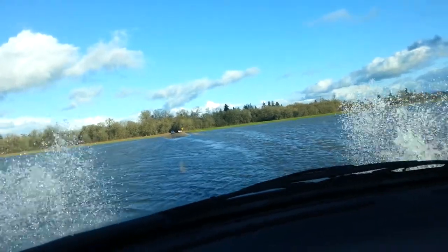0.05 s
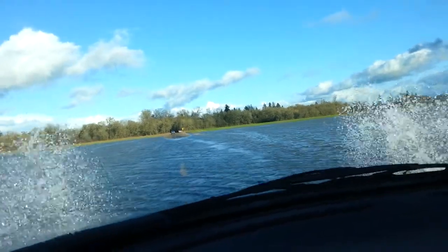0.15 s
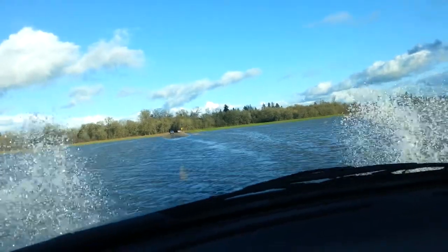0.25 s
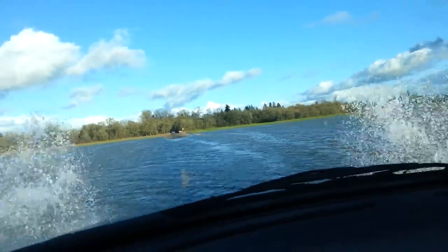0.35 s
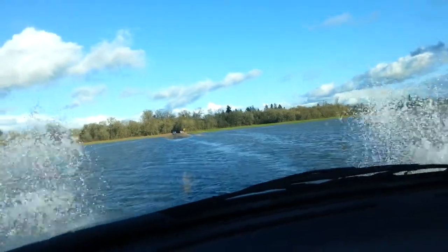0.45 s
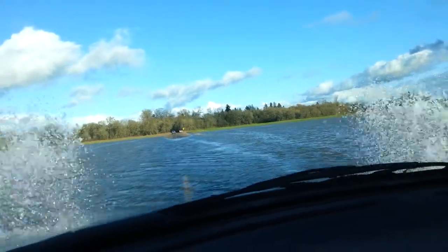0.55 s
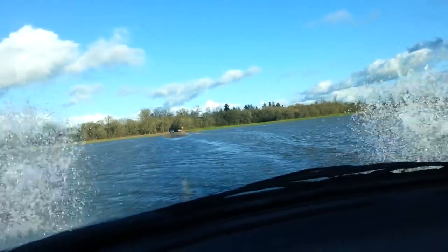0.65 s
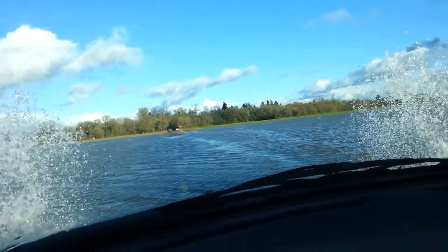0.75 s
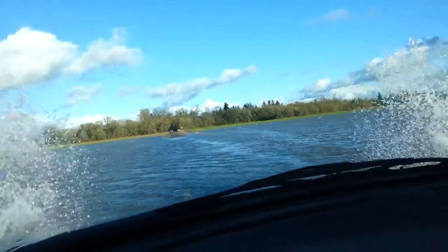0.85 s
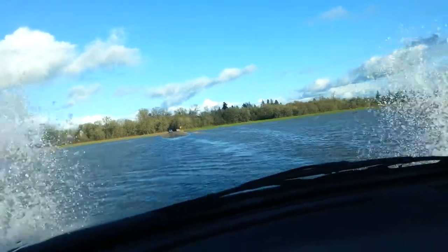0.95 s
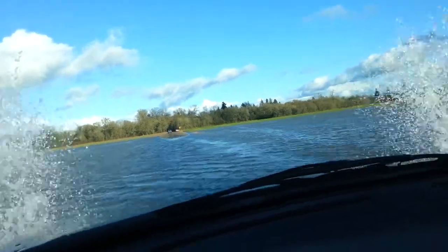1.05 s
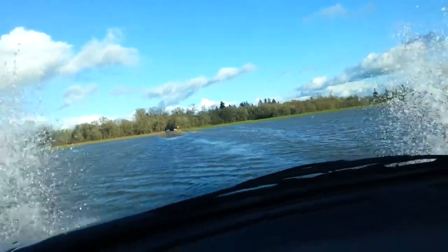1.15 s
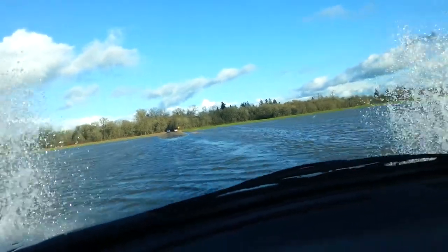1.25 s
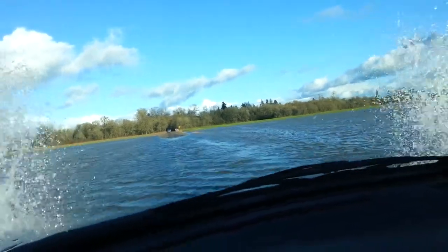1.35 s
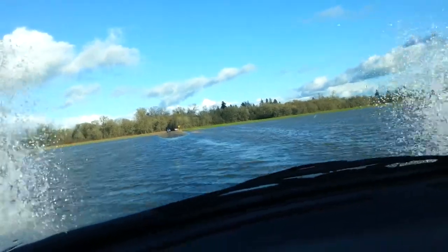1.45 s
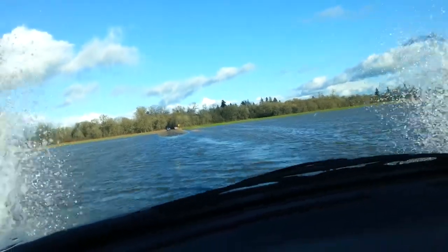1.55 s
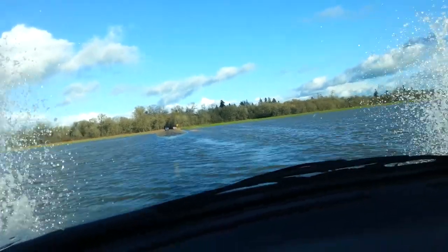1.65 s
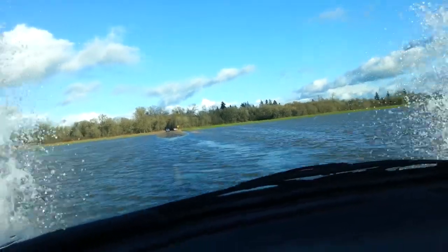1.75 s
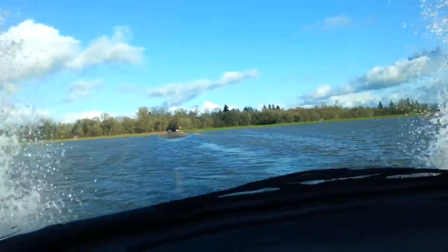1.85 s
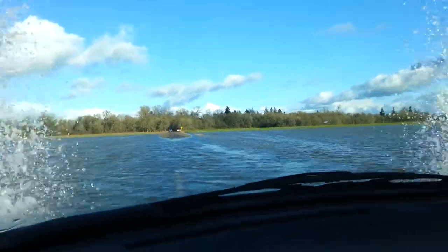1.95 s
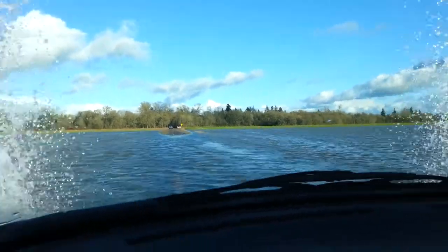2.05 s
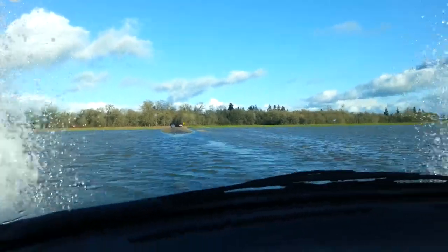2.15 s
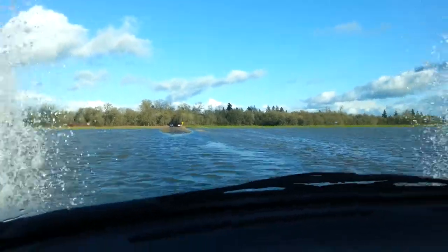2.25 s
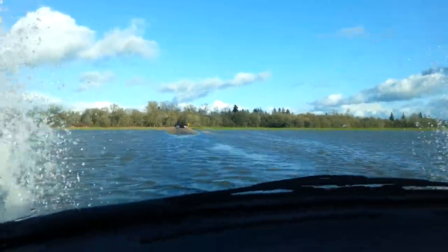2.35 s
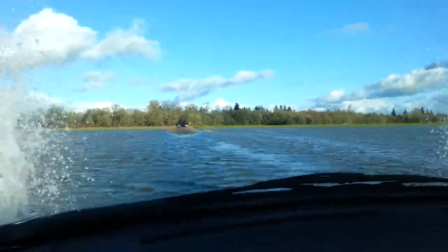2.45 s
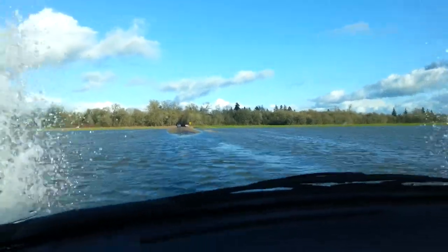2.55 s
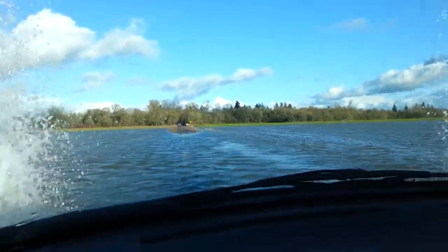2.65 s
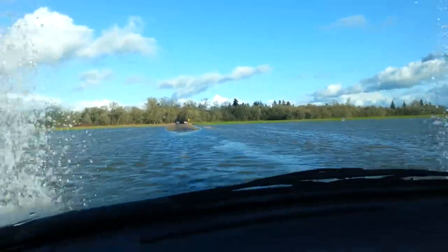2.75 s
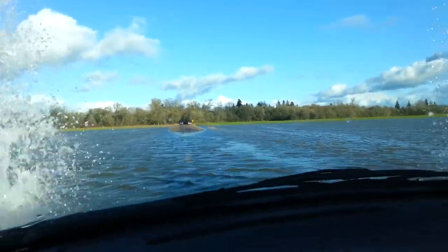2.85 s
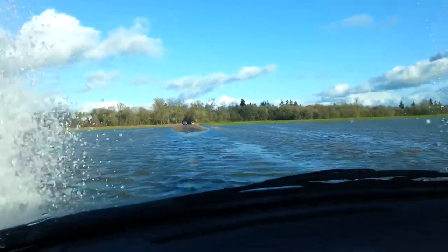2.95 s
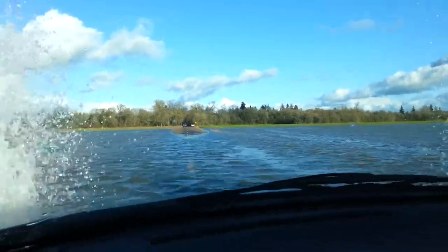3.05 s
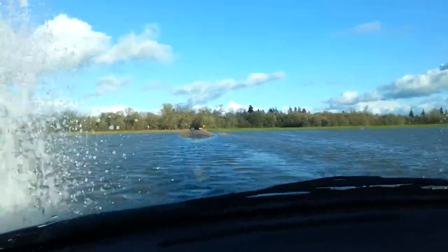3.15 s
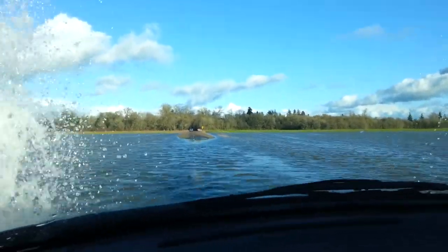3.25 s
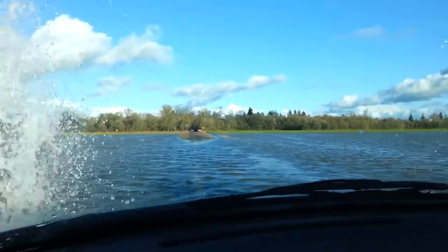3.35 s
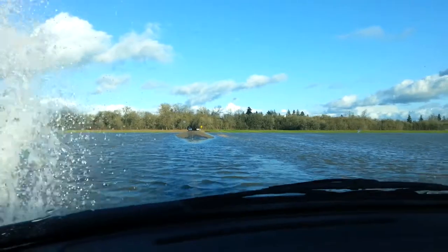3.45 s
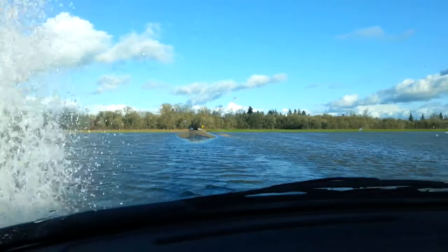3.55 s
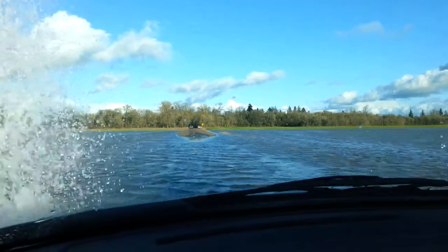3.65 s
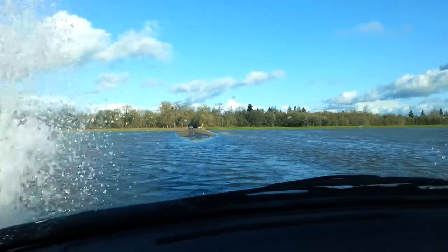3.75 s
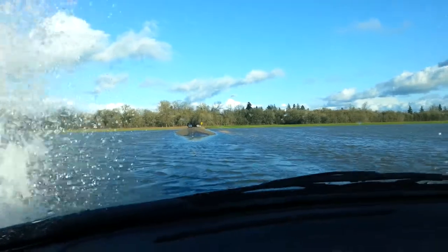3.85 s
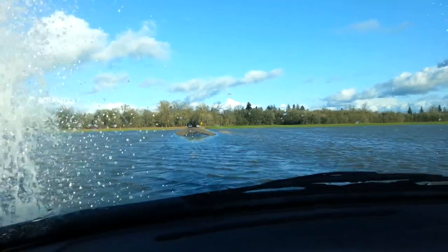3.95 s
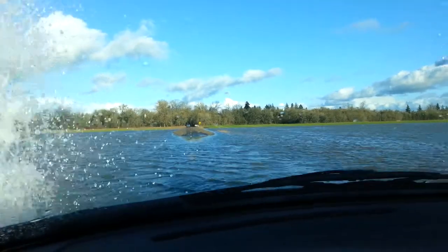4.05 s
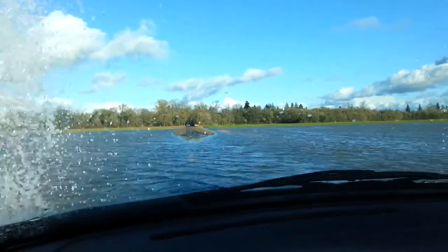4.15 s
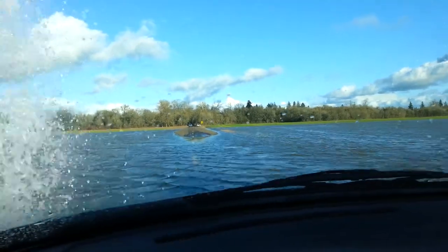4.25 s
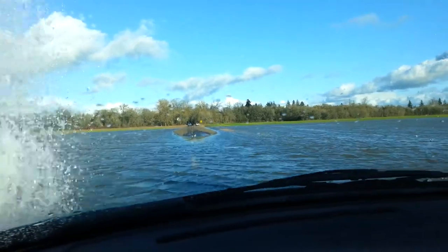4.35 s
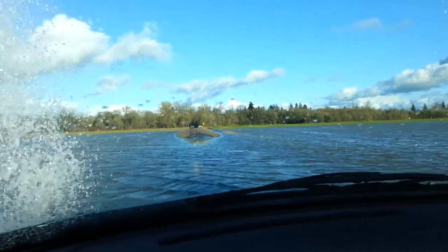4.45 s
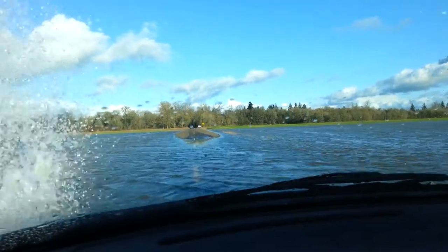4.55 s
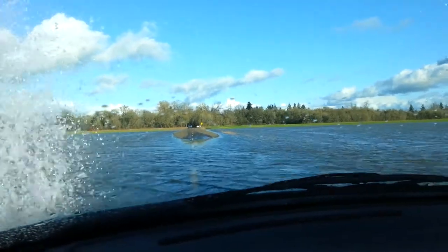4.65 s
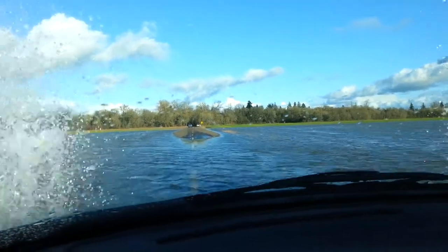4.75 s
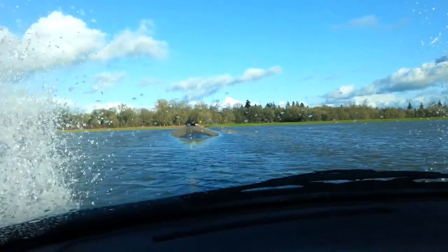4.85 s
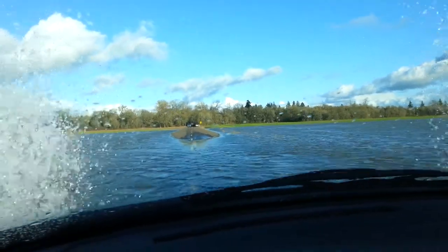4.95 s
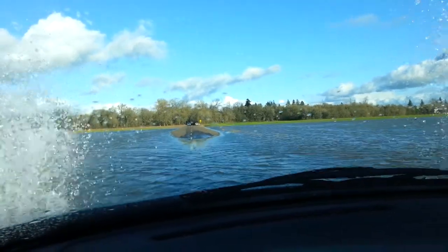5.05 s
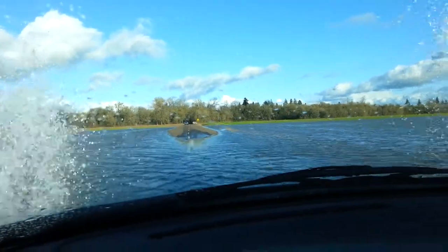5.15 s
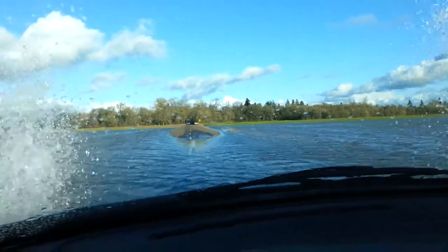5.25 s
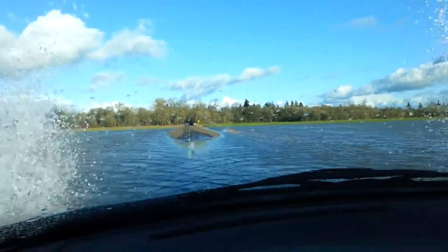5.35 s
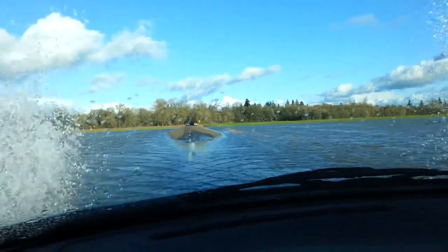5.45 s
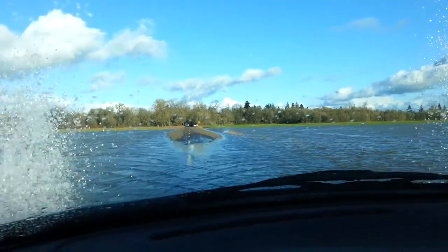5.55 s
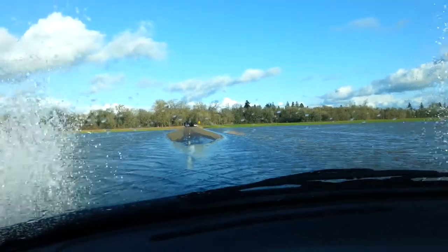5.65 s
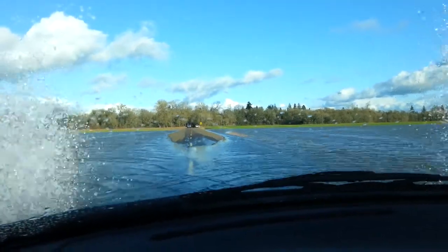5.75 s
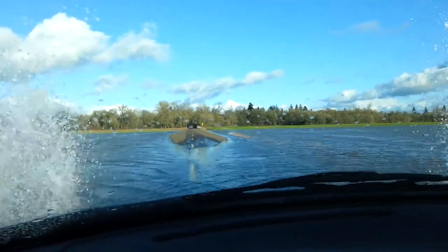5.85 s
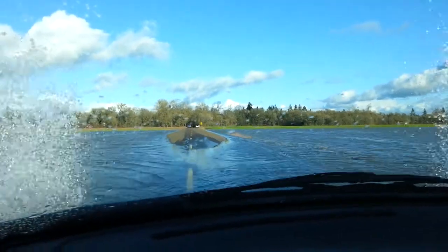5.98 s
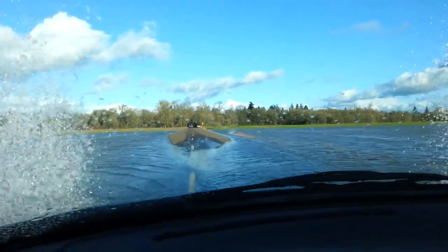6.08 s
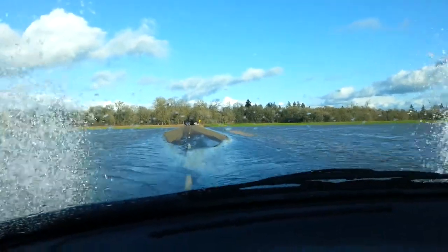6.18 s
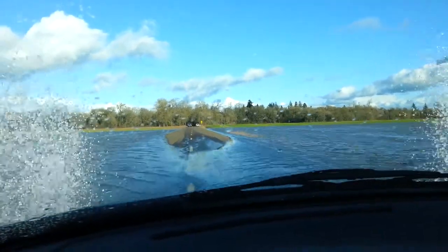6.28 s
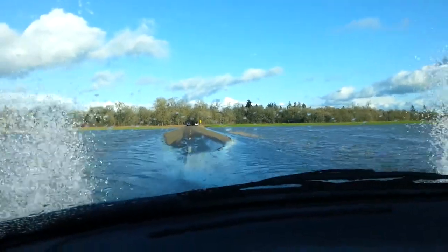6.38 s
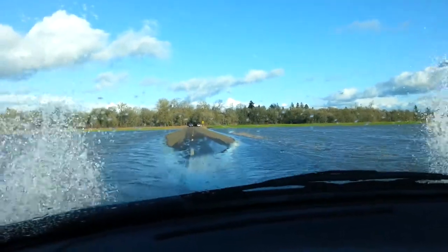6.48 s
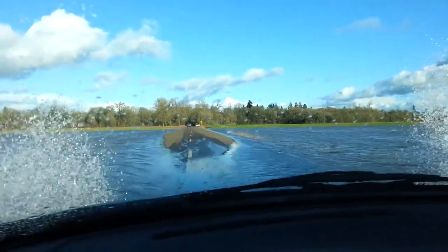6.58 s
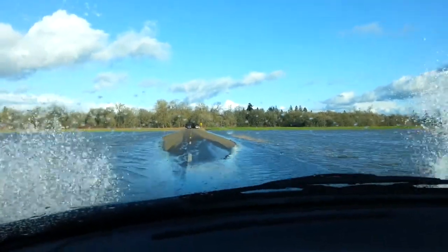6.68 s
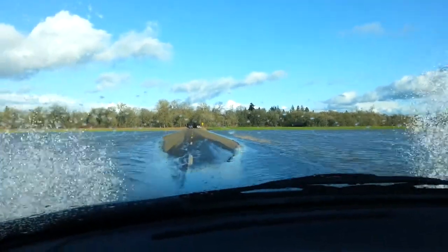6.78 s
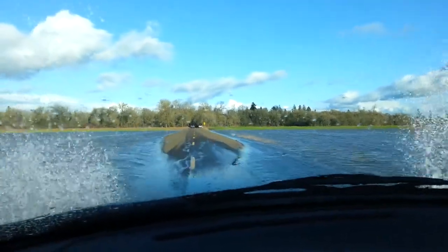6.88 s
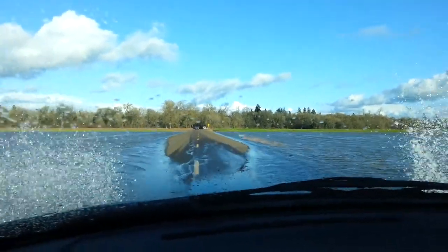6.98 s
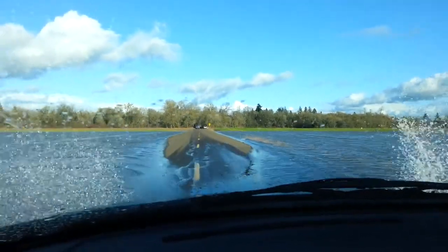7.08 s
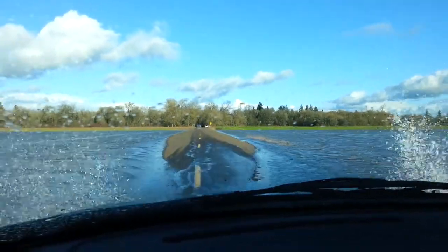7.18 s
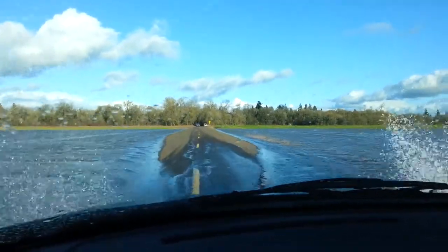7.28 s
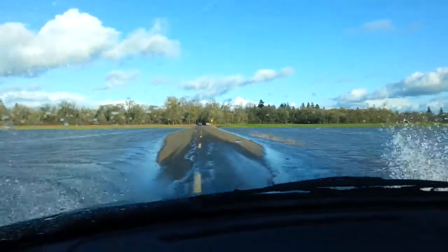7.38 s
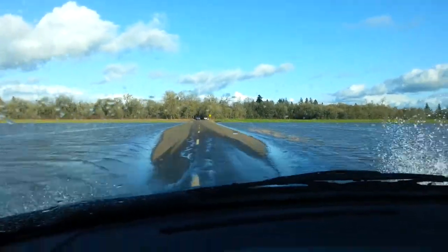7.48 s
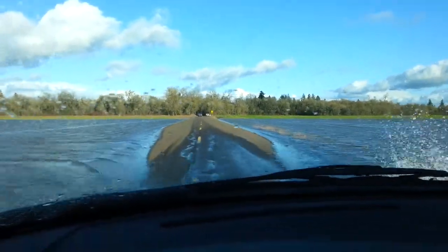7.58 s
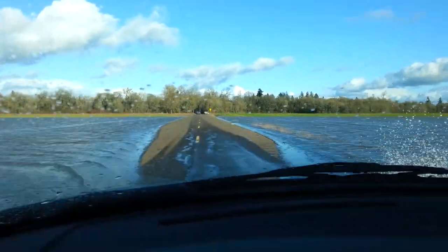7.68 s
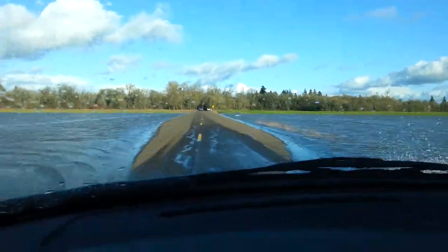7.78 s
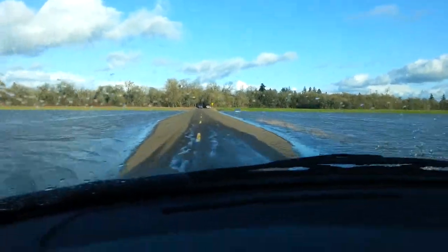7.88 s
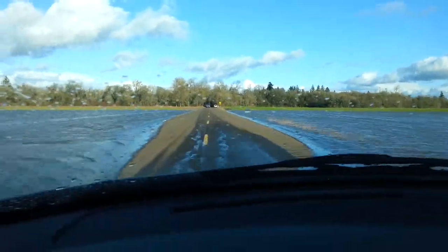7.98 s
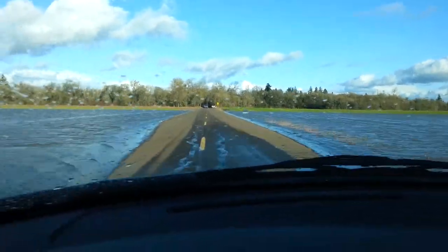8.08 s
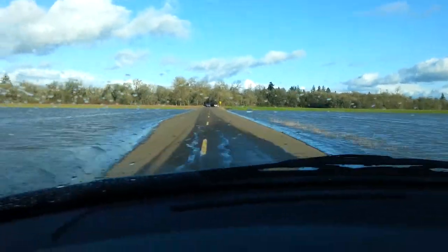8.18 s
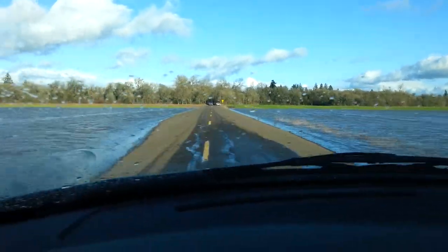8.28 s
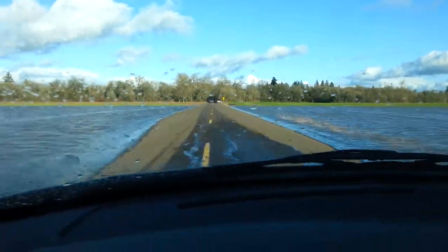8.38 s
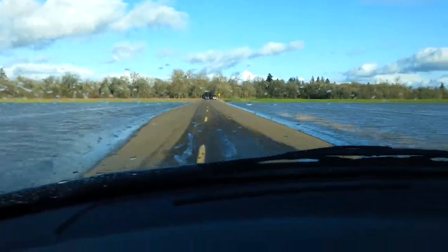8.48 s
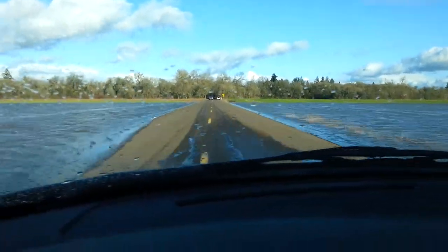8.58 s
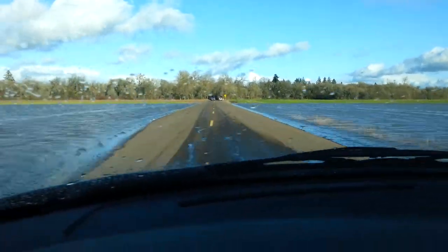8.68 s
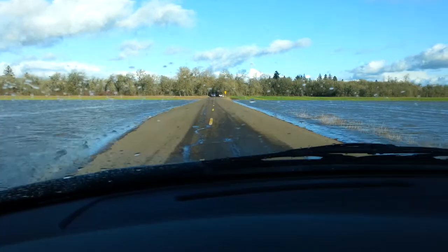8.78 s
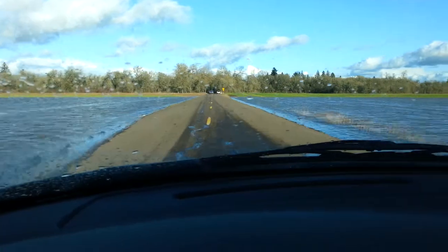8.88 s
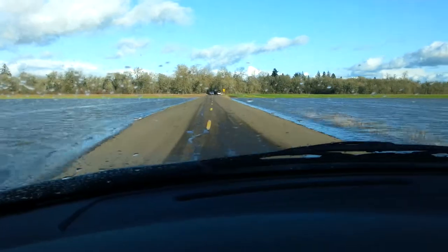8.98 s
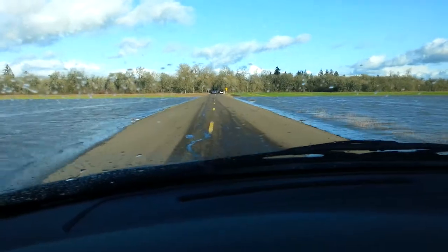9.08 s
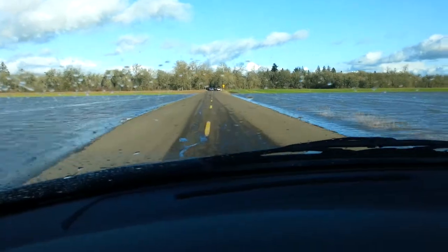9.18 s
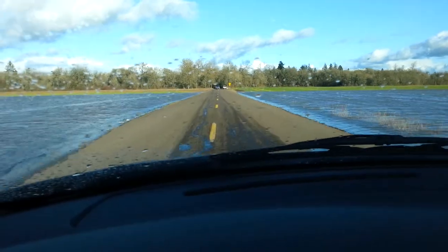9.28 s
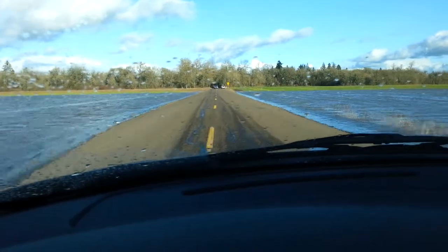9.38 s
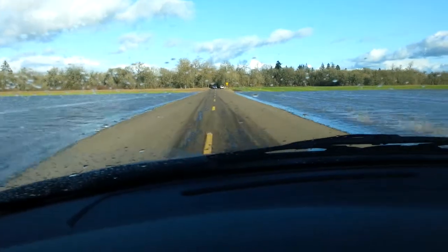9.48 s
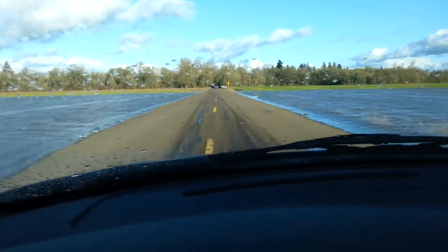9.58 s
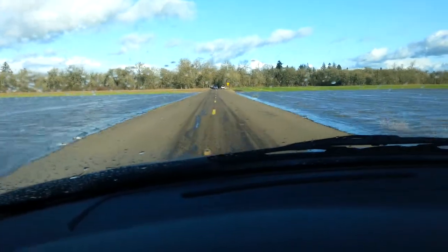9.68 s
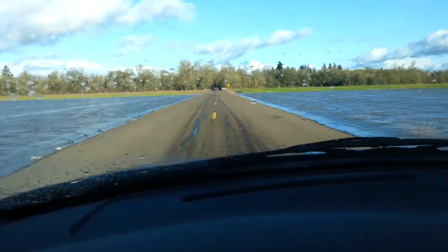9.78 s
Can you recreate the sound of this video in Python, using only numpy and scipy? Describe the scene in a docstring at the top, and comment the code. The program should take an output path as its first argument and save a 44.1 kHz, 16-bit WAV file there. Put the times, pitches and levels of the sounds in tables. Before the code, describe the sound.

Heard from a dashboard inside a moving car: floodwater drums heavily on the floor pan, surging with dull slaps, spray in the wheel arches and ringing plinks. Around seven seconds the pounding falls away quickly, leaving tyre roar, a low engine note, a brief rising gear whine and a few small splats, with faint hiss.

```python
"""Inside a car in floodwater, heard by a phone on the dashboard. From 0 to 7 s sheets of water drum on the
floor pan in surges, with slaps, plinks and spray in the wheel arches; a thin top tone lasts to 2.1 s and
squeaks come at 3.4 and 5.1 s. From 7 s the road dries: tyre roar, engine note, a gear whine to 8.5 s, last
splats and plinks, a squeak at 8.7 s and clearer hiss. Water is random noise bursts shaped in spectrum and
level; slaps and plinks are damped sines; engine, whine and squeaks are wavering sines."""
import sys
import numpy as np
from scipy import signal
from scipy.fft import rfft, irfft, next_fast_len
from scipy.io import wavfile
from scipy.ndimage import uniform_filter1d

SR = 44100
rng = np.random.default_rng(int(sys.argv[2]) if len(sys.argv) > 2 else 0)


def digitize_waveform(pressure):
    """Quantize a signal to 16-bit integers and store it at the path in sys.argv[1].

    Rows of a 2-D input are taken as channels; values are limited to [-1, 1].
    """
    field = np.atleast_2d(pressure).T
    bounded = np.clip(field, -1, 1)
    quanta = np.round(bounded * 32767).astype(np.int16)
    wavfile.write(sys.argv[1], SR, quanta)


N = 433062


def undb(db):
    """Amplitude ratio from dB."""
    return 10 ** (np.asarray(db) / 20)


def level(x, rms_db):
    """Scale to an RMS level."""
    return x * undb(rms_db) / np.sqrt(np.mean(x ** 2))


def curves(table):
    """Value columns of a time table as sample-rate curves."""
    time_s, *columns = np.transpose(table)
    return [np.interp(np.arange(N) / SR, time_s, c) for c in columns]


def on_log(hz, table):
    """A (frequency [Hz], value) table read on a log frequency axis."""
    table_hz, value = np.transpose(table)
    return np.interp(np.log(np.maximum(hz, 1)), np.log(table_hz), value)


def butter(x, order, hz, kind):
    """Causal Butterworth filter."""
    return signal.sosfilt(signal.butter(order, hz, kind, fs=SR, output="sos"), x)


def walk(rate_hz):
    """Random levels held 1 / rate_hz, then smoothed twice; spread near 1."""
    hold = int(SR / rate_hz)
    steps = np.repeat(rng.standard_normal(N // hold + 1), hold)
    return 1.3 * uniform_filter1d(uniform_filter1d(steps, hold), hold)[:N]


def drops(rate_hz, spread_db, t60_s):
    """Two streams of random impacts, a few much bigger than the rest, each a noise burst dying in the cabin."""
    hit = rng.random((2, N)) < rate_hz / SR
    power = hit * undb(2 * spread_db * rng.exponential(size=(2, N)))
    fade = np.exp(-2 * np.log(1000) / (t60_s * SR))
    envelope = np.sqrt(signal.lfilter([1], [1, -fade], power))
    return envelope * rng.standard_normal((2, N))


# likeness of the ears before the phase turn: (frequency [Hz], left-right correlation [-])
EAR_LIKENESS = [(60, 0.94), (130, 1), (290, 0.89), (620, 0.55), (1100, 0.43), (2500, 0.29), (4000, 0),
                (14000, 0)]
# phase lead of the left port: (frequency [Hz], lead [rad])
PORT_LEAD = [(700, 0), (1030, -1.76), (1890, -2.5), (2900, -6)]


def colour(pair, spectrum, flicker_db=0., shared_db=0., rate_hz=10.):
    """Two streams through a body and the cabin at unit RMS: wide bands waver, the bass is alike in both ears."""
    size = next_fast_len(N)
    hz = np.arange(size // 2 + 1) * SR / size
    like = np.clip(on_log(hz, EAR_LIKENESS), -1, 1)
    mid, side = rfft(pair, size) * undb(on_log(hz, spectrum)) * np.sqrt([1 + like, 1 - like])
    right_turn = np.exp(-1j * on_log(hz, PORT_LEAD))
    ears = np.array([mid + side, (mid - side) * right_turn])
    if not flicker_db:
        return level(irfft(ears, size)[:, :N], 0)
    # six overlapping bands, 1.5 octaves apart from 60 Hz
    band = np.clip(np.log2(np.maximum(hz, 1) / 60) / 1.5, 0, 5)
    out = 0
    for k in range(6):
        weight = np.clip(1 - np.abs(band - k), 0, 1)
        out = out + irfft(ears * weight, size)[:, :N] * undb(flicker_db * walk(rate_hz))
    return level(out * undb(shared_db * walk(rate_hz)), 0)


def rings(events, rise_cycles, ring_cycles, gain_db):
    """Damped sines at (time [s], level [dB], pitch [Hz]): swell and decay last a number of cycles."""
    out = np.zeros(N + SR)
    for time_s, db, hz in events:
        cycles = np.arange(int(8 * ring_cycles / hz * SR)) * hz / SR
        envelope = (1 - np.exp(-cycles / rise_cycles)) * np.exp(-cycles / ring_cycles)
        i = int(time_s * SR)
        out[i:i + len(cycles)] += undb(db + gain_db) * np.sin(2 * np.pi * cycles) * envelope
    return out[:N]


def sing(table, waver, flutter_db):
    """A thin tone along (time [s], pitch [Hz], level [dB]), rough in pitch (waver: fraction) and level."""
    hz, db = curves(table)
    gain = undb(db + flutter_db * walk(25))
    phase = 2 * np.pi * np.cumsum(hz * (1 + waver * walk(40))) / SR
    return np.sqrt(2) * gain * np.sin(phase)


# tyres on the road: (time [s], level [dB])
TYRE_LEVEL = [(0, -32), (7, -33), (7.6, -29.5), (8.2, -28.5), (8.5, -28.5), (8.9, -28.5), (9.3, -29),
              (9.6, -29), (9.82, -28.5)]
# tyre roar through the body: (frequency [Hz], relative density [dB per Hz])
ROAR_SPECTRUM = [(18, -65), (30, -36), (55, -22.5), (76, -6), (97, -12), (125, -13), (260, -6),
                 (320, -11.5), (456, -14), (621, -21.5), (720, -18.5), (940, -17), (1010, -27),
                 (2000, -36.5), (3900, -46), (4500, -44), (5100, -52.5), (5900, -54.5), (9000, -57.5),
                 (11700, -78.5)]


def road():
    """Tyre roar: noise through the body, its bands wavering with the surface."""
    roar = colour(rng.standard_normal((2, N)), ROAR_SPECTRUM, flicker_db=0.1, rate_hz=8)
    return roar * undb(curves(TYRE_LEVEL)[0])


# engine: (time [s], firing rate [Hz], level [dB])
ENGINE_RUN = [(0, 90, -40), (1, 95, -36), (2.3, 101, -33), (4, 105, -35), (6, 106, -35), (7.3, 106.5, -32),
              (7.85, 106, -31), (8.12, 109, -32.5), (8.63, 109, -33), (8.9, 104, -33), (9.03, 93, -33),
              (9.82, 93, -33.5)]
# engine orders: (multiple of firing rate [-], relative level [dB])
ENGINE_ORDERS = [(.5, -17), (1, -1), (1.5, -11.5), (2, -5.5), (3, -19.5)]


def engine():
    """Orders of the firing rate boom in the cabin, each wavering in level."""
    firing_hz, db = curves(ENGINE_RUN)
    turn = 2 * np.pi * np.cumsum(firing_hz * (1 + 0.0034 * walk(12))) / SR
    boom = 0
    for order, order_db in ENGINE_ORDERS:
        gain = undb(order_db + 0.63 * order * walk(11))
        boom = boom + gain * np.sin(order * turn + order * order)
    return np.sqrt(2) * undb(db) * boom


# gear whine under load: (time [s], pitch [Hz], level [dB])
WHINE_RUN = [(7.25, 684, -70), (7.45, 684, -49), (7.57, 688, -50), (7.65, 698, -42), (7.95, 715, -41),
             (8.15, 727, -42.5), (8.38, 746, -41.5), (8.5, 750, -80)]


def gear_whine():
    """The loaded gears sing one rising, slightly rough tone."""
    return sing(WHINE_RUN, waver=.0025, flutter_db=1.5)


# faint squeaks: (time [s], length [s], level [dB], end pitch [Hz], rise [Hz])
SQUEAK_EVENTS = [(3.385, .35, -49.5, 4150, 560), (5.115, .375, -50.5, 4170, 590),
                 (8.73, .078, -61, 3620, 150)]
ARCH_DIP_DB = 13  # at the top of the arch, for lengths of 0.35 s and up; less if shorter


def squeaks():
    """Thin broken tones, each an arch of pitch, fainter at its top and faded at its ends."""
    along = np.linspace(0, 1, 21)
    arch = np.sqrt(np.abs(np.sin(np.pi * along)))
    out = 0
    for time_s, length_s, db, end_hz, rise_hz in SQUEAK_EVENTS:
        dip_db = ARCH_DIP_DB * min(length_s / .35, 1) * arch ** 3
        end_fade_db = 100 * np.maximum(.42 - arch, 0)
        path = [time_s + length_s * along, end_hz + rise_hz * arch, db - dip_db - end_fade_db]
        out = out + sing(np.transpose(path), waver=.006, flutter_db=2.5)
    return out


# splats on glass and trim: (time [s], envelope peak [dB], rise [s], ring T60 [s], left minus right [dB])
SPLAT_EVENTS = [(.498, -53, .002, .045, 2), (1.219, -53, .0008, .03, 3.5), (2.238, -45, .003, .06, 2),
                (2.76, -35, .0005, .015, 14), (5.15, -54, .002, .046, 2), (5.262, -52, .002, .05, 3),
                (7.927, -43, .015, .12, 3), (8.014, -42, .015, 0.077, 5), (8.07, -46, .006, 0.11, 4),
                (8.22, -42, .006, .09, 2.5), (8.319, -41.5, .006, 0.11, 5), (8.455, -50, .004, .08, 2),
                (8.846, -49, .004, .05, 4)]
# splat colour: (frequency [Hz], relative density [dB per Hz])
SPLAT_SPECTRUM = [(600, -30), (1500, -3), (2400, -2), (2950, 3.5), (3700, -3), (4450, 4), (5200, -5),
                  (6500, -7), (10000, -9), (14000, -23)]


def splats():
    """Short bursts of fine droplets: a quick swell and a ring."""
    shape, t = np.zeros((2, N + SR)), np.arange(SR // 4) / SR
    for time_s, db, rise_s, t60_s, pan_db in SPLAT_EVENTS:
        burst = (1 - np.exp(-t / rise_s)) * np.exp(-np.log(1000) * t / t60_s)
        ear_db = db + np.array([[.5], [-.5]]) * pan_db
        i = int(time_s * SR)
        shape[:, i:i + len(t)] += undb(ear_db) * burst / burst.max()
    droplets = drops(rate_hz=2500, spread_db=2.4, t60_s=0.0097)
    return shape[:, :N] * colour(droplets, SPLAT_SPECTRUM)


# big drops that ring where they land: (time [s], level before ring gain [dB], pitch [Hz])
BIG_DROPS = [(.162, -31, 2050), (.229, -23, 696), (.281, -30, 2150), (.325, -28, 1240), (.46, -29.5, 2300),
             (.476, -23, 850), (.521, -32, 1330), (.528, -31, 1710), (.784, -24.5, 776), (.976, -31, 920),
             (1.197, -28, 1390), (1.2, -31, 1860), (1.203, -34, 1140), (1.478, -34, 1380),
             (1.897, -34, 1550), (2.008, -33, 785), (2.078, -27.5, 2430), (2.541, -27, 2630),
             (2.582, -26, 2500), (2.741, -23, 716), (2.856, -33, 2750), (2.869, -25, 2620),
             (2.875, -29, 2610), (4.287, -27, 1260), (4.724, -32, 1250), (4.892, -34, 1210),
             (4.945, -24, 865), (4.984, -25.5, 1050), (5.117, -33, 1150), (5.704, -39, 800),
             (6.06, -34, 2425), (6.1, -24, 870), (6.24, -27, 2500), (6.25, -31, 1510), (6.429, -25, 805),
             (7.63, -34, 754), (7.938, -39, 4800), (7.976, -39, 2700), (7.993, -44, 4450),
             (8.078, -42, 3900), (8.115, -45, 4200), (8.02, -32, 4500), (8.022, -35, 3080),
             (8.226, -37, 2800), (8.254, -41, 4500), (8.324, -37, 4300), (8.345, -46, 5000),
             (8.848, -47, 4000)]
# hard little ticks on the glass: (time [s], level before ring gain [dB], pitch [Hz])
GLASS_TICKS = [(6.6428, -27, 3250), (8.0212, -32, 4370), (8.2237, -33, 3920), (8.323, -33, 2970)]
TRIM_HZ = 2770  # drops pitched above this ring for more cycles
SMALL_DROPS_DB = -7  # offset from the spray level, before the random spread


def plinks(spray_db):
    """Ringing big drops, ticks, and in each ear a scatter of smaller drops that follows the spray."""
    ears = []
    for chance in rng.random((2, 900, 3)):
        time_s = chance[:, 0] * N / SR
        spread_db = -4 * np.log(chance[:, 1] + .03)
        db = spray_db[(time_s * SR).astype(int)] + SMALL_DROPS_DB + spread_db
        hz = 650 * 5.5 ** chance[:, 2]
        ears.append(rings(zip(time_s, db, hz), rise_cycles=1, ring_cycles=4.5, gain_db=0))
    low = [drop for drop in BIG_DROPS if drop[2] <= TRIM_HZ]
    high = [drop for drop in BIG_DROPS if drop[2] > TRIM_HZ]
    big = rings(low, .8, 7, 2.4) + rings(high, 1.5, 15, .4)
    return big + rings(GLASS_TICKS, .4, 1.7, 4.5) + np.array(ears)


# slugs of water on the floor: (time [s], level before ring gain [dB], pitch [Hz])
SLUGS = [(.03, -2.5, 244), (.233, -9, 228), (.998, -12.5, 186), (2.052, -5, 201), (2.096, -4, 214),
         (2.118, -9.5, 213), (2.267, -3, 202), (2.293, -3, 232), (2.509, -9, 224), (2.581, -15, 206),
         (2.68, -2.5, 168), (2.882, -5, 259), (3.053, -4.5, 195), (3.08, -3.5, 224), (3.13, -7, 212),
         (3.273, 1, 211), (3.375, -8, 200), (3.436, -5.5, 205), (3.631, -6.5, 176), (3.65, -8, 179),
         (3.686, -5.5, 200), (3.933, -5.5, 232), (4.078, -6, 250), (4.131, -4, 214), (4.302, -5, 162),
         (4.351, -6, 227), (4.594, -6.5, 220), (4.89, -4.5, 201), (4.942, -6.5, 204), (5.019, -3.5, 268),
         (5.071, -7, 231), (5.272, -3.5, 236), (5.289, -7, 215), (5.348, -6, 202), (6.034, -7, 219),
         (6.115, -5, 213), (6.207, -4, 268), (6.255, -6.5, 238), (6.627, -6, 286), (6.651, -4, 236),
         (6.894, -11.5, 175), (6.99, -9.5, 225), (8.477, -12.5, 213)]
PAN_LOWEST_HZ = 80  # the floor pan gives little below this


def thumps():
    """Each slug slaps the floor: one hard cycle and a quick dying wobble."""
    slaps = rings(SLUGS, rise_cycles=0.34, ring_cycles=0.89, gain_db=5.15)
    return butter(slaps, 2, PAN_LOWEST_HZ, "high")


# steady wash, thinning on the damp road: (time [s], drumming [dB], spray [dB])
WASH_LEVEL = [(0, -17, -33.5), (.7, -21.5, -36.5), (1.6, -21.5, -37), (2.4, -20, -40), (3.6, -20.5, -38.5),
              (4.8, -18.5, -36), (5.6, -20, -36.5), (6.5, -20, -38), (7.1, -19.5, -42), (7.35, -26, -39.5),
              (7.6, -32.5, -41), (7.9, -56, -41), (8.4, -80, -42.5), (9.82, -80, -53)]
# surges thrown up by the wheels: (time [s], hold [s], drumming [dB], spray [dB])
WHEEL_SURGES = [(0.008, 0.015, -23.5, -38), (0.23, .01, -26, -34.5), (0.493, .01, -31, -41),
                (.973, .01, -20, -36.5), (1.144, .01, -22, -35.5), (1.857, 0.022, -41, -36.5),
                (2.024, 0.08, -17.5, -32.5), (2.245, 0.023, -16.5, -32.5), (2.469, 0.073, -20, -31.5),
                (2.567, .04, -20.5, -36), (2.67, .07, -19.5, -34), (2.844, .02, -15.5, -33.5),
                (2.948, 0.043, -18, -32), (3.047, 0.055, -17.5, -34), (3.253, 0.084, -16.5, -32.5),
                (3.418, .01, -16, -34.5), (3.605, 0.048, -18, -35), (3.921, .01, -17.5, -34.5),
                (4.053, 0.059, -19, -33), (4.279, 0.009, -15, -32.5), (4.555, 0.091, -18.5, -36),
                (4.872, .06, -18.5, -33), (4.98, .01, -14.5, -43), (5.263, .01, -17, -33.5),
                (6.016, 0.057, -17, -36.5), (6.094, .01, -23.5, -37), (6.195, 0.036, -19, -35.5),
                (6.604, .01, -17, -35.5), (6.782, .02, -27, -37), (6.967, 0.053, -19, -35)]
SURGE_ATTACK_S = 0.024


def surging(column, fall_db_per_s):
    """Level in dB of the wash plus every surge: quick rise, hold, steady fall, 1 s in all."""
    t = np.arange(N) / SR
    power = undb(2 * curves(WASH_LEVEL)[column])
    for time_s, hold_s, *db in WHEEL_SURGES:
        i = slice(int(time_s * SR), int(time_s * SR) + SR)
        age_s = t[i] - time_s
        rise = np.clip(age_s / SURGE_ATTACK_S, 0, 1)
        fall_db = fall_db_per_s * np.maximum(age_s - SURGE_ATTACK_S - hold_s, 0)
        power[i] += (rise * undb(db[column] - fall_db)) ** 2
    return 10 * np.log10(power)


# floor pan: (frequency [Hz], relative density [dB per Hz])
PAN_SPECTRUM = [(18, -59), (30, -38.5), (93, -5.5), (135, -0.5), (260, -3.5), (349, -5), (590, -16.5),
                (754, -22), (949, -26.5), (1230, -27.5), (1500, -37.5), (1950, -56.5), (3300, -120)]
# wheel arches: (frequency [Hz], relative density [dB per Hz])
ARCH_SPECTRUM = [(350, -21.5), (600, -9), (747, -1), (1060, -12.5), (1230, -10), (1670, -14), (2290, -14.5),
                 (2580, -14), (3630, -21), (4100, -21), (4500, -19), (4950, -25), (5770, -31), (8020, -35),
                 (11000, -48.5), (14300, -73.5), (22000, -120)]
# colour of the drumming: (time [s], gain below DEEP_HZ [dB], gain around BODY_BAND_HZ [dB])
DRUM_COLOUR = [(0, -2.5, -0.5), (1.2, 0.5, -0.5), (2.2, 1, .1), (4.5, 1.5, 0.4), (5.5, -2, 0.7),
               (6.2, -2, 3), (7.2, -0.2, -1)]
# body band of the drumming: (low edge [Hz], high edge [Hz])
BODY_BAND_HZ = (260, 378)
DEEP_HZ = 125


def water(drum_db, spray_db):
    """Heavy sheets drum the floor pan; fine spray patters in the arches."""
    sheets = drops(rate_hz=600, spread_db=1.15, t60_s=0.11)
    drum = colour(sheets, PAN_SPECTRUM, flicker_db=0.17, shared_db=0.3, rate_hz=14)
    # zero-phase bands, so that they add in step with the drumming
    deep = signal.sosfiltfilt(signal.butter(2, DEEP_HZ, fs=SR, output="sos"), drum)
    body = signal.sosfiltfilt(signal.butter(1, BODY_BAND_HZ, "band", fs=SR, output="sos"), drum)
    deep_gain, body_gain = undb(curves(DRUM_COLOUR))
    drum = drum + (deep_gain - 1) * deep + (body_gain - 1) * body
    patter = drops(rate_hz=2000, spread_db=1.3, t60_s=0.092)
    spray = colour(patter, ARCH_SPECTRUM, flicker_db=0.75, shared_db=0.19, rate_hz=22)
    return drum * undb(drum_db) + spray * undb(spray_db)


def scene():
    """All sources in the cabin; small drops share the level of the spray."""
    drum_db = surging(column=0, fall_db_per_s=99.5)
    spray_db = surging(column=1, fall_db_per_s=41)
    car = road() + engine() + gear_whine() + squeaks()
    return car + splats() + plinks(spray_db) + thumps() + water(drum_db, spray_db)


# port balance: (frequency [Hz], left minus right [dB])
PORT_LEAN = [(60, 1), (110, -0.5), (200, -1.0), (370, -1.0), (680, -0.5), (1250, 1.5), (2290, 6), (4210, 7),
             (7730, -2.5), (14200, -12.5)]
# thin steady tone: (frequency [Hz], peak level [dB], end [s])
TOP_TONE = (14000, -74, 2.12)
# treble hiss: (time [s], level [dB])
HISS_LEVEL = [(0, -75), (2, -65.5), (5, -70), (6.8, -70), (7.6, -60.5), (9.82, -58)]
# hiss colour: (frequency [Hz], relative density [dB per Hz])
HISS_SPECTRUM = [(3000, -11.5), (8000, -2), (11000, -3.5), (14500, -2)]
BASS_CUT_HZ, TOP_CUT_HZ = 46, 14600


def record(dry):
    """The phone: unequal ports, hiss and a thin tone, then bass cut, rounded peaks and a steep top cut."""
    size = next_fast_len(N)
    lean_db = on_log(np.arange(size // 2 + 1) * SR / size, PORT_LEAN)
    ports = irfft(rfft(dry, size) * undb([lean_db / 2, -lean_db / 2]), size)[:, :N]
    tone_hz, tone_db, end_s = TOP_TONE
    t = np.arange(N) / SR
    tone_fade = np.clip((end_s - t) * 20, 0, 1)
    tone = undb(tone_db) * np.sin(2 * np.pi * tone_hz * t) * tone_fade
    hiss = undb(curves(HISS_LEVEL)[0]) * colour(rng.standard_normal((2, N)), HISS_SPECTRUM)
    thin = butter(ports + hiss + tone, 2, BASS_CUT_HZ, "high")
    rounded = thin / (1 + np.abs(thin / .9) ** 4) ** .25  # approaches 0.9 of full scale
    return signal.sosfilt(signal.ellip(18, .2, 120, TOP_CUT_HZ, fs=SR, output="sos"), rounded)


dry = scene()
out = record(dry)
digitize_waveform(out)
```